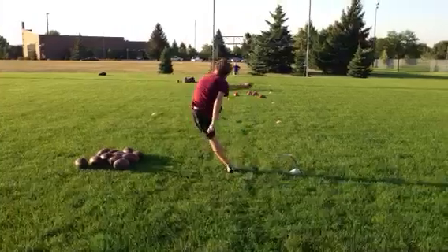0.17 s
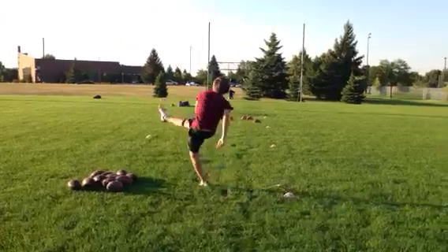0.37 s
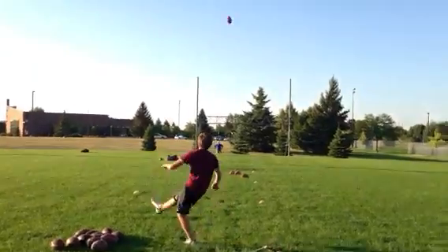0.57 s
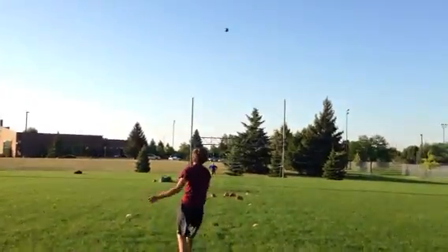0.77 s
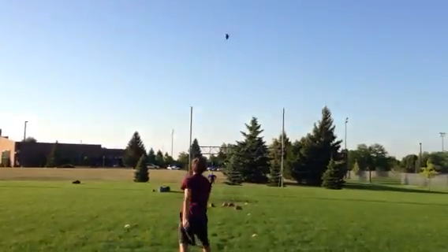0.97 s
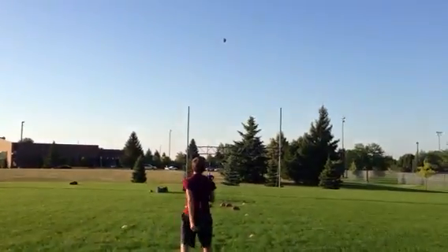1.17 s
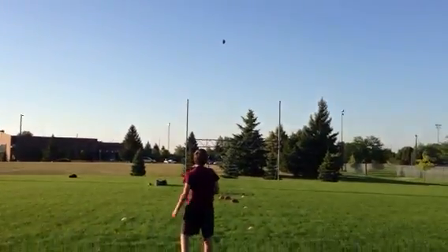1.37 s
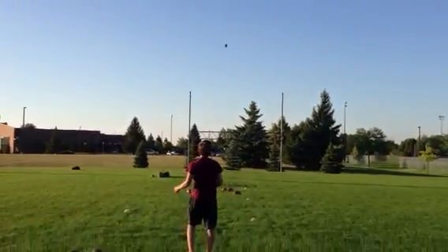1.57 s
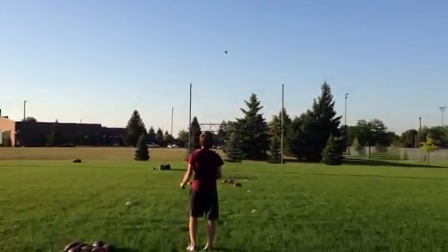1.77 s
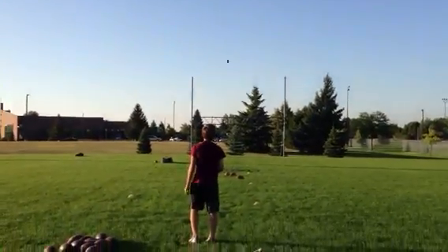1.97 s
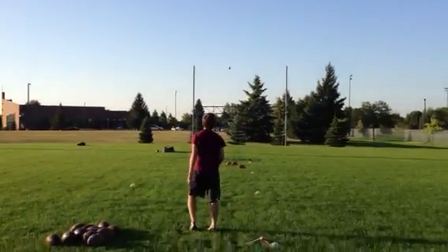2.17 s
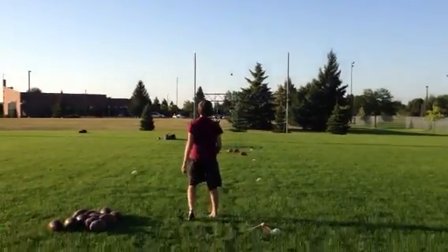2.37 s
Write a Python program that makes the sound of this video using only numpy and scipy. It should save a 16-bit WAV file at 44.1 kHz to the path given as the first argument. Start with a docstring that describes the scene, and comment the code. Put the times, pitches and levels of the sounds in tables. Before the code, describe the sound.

A football kick dominates: low foot thumps at the start, a brief grass swish near 0.1 seconds, then a sharp leathery slap with a short hollow boom at 0.13. Dense dull thumps follow until about 0.7, with a faint holder clink at 0.5. Sparse soft footfalls come near 1.2, 1.7 and 2.1, with tiny dry ticks, over faint distant traffic on an open field.

```python
"""Far traffic hum and clusters of dull low thumps, feet and turf on a grass field, run throughout.
A boot swishes through the grass and slaps a football off its holder; the ball booms briefly.
Faint clinks of the tipping holder and dry ticks are scattered after the kick, with fainter swishes.
Thumps are swelling and dying sines; ball and holder are damped modes; the rest is shaped noise.
The phone that hears it all passes neither deep bass nor the extreme treble."""
import sys
import numpy as np
from scipy import signal
from scipy.fft import rfft, irfft, next_fast_len
from scipy.io import wavfile
from scipy.ndimage import uniform_filter1d, map_coordinates

SR = 44100
rng = np.random.default_rng(int(sys.argv[2]) if len(sys.argv) > 2 else 0)


def bounce(signal):
    """Save signal as a 16-bit WAV file at the path given by the first command-line argument."""
    frames = np.transpose(np.atleast_2d(signal))
    limited = np.clip(frames, -1, 1)
    pcm = np.round(limited * 32767).astype(np.int16)
    wavfile.write(sys.argv[1], SR, pcm)


N = 105928  # length in samples


def amp(db):
    """dB to gain."""
    return 10 ** (np.asarray(db) / 20)


def decay(t, t60):
    """Gain that falls 60 dB in t60 seconds."""
    return amp(-60 * t / t60)


def unit(x):
    """Scale to rms 1."""
    return x / np.sqrt(np.mean(x ** 2) + 1e-20)


def filtered(x, response):
    """x times a complex response of frequency."""
    m = next_fast_len(N + SR // 2)
    spectrum = rfft(x, m) * response(np.fft.rfftfreq(m, 1 / SR))
    return irfft(spectrum, m)[..., :N]


def coloured(x, points):
    """x shaped by (Hz, dB) points on a log frequency axis, rms 1."""
    f, db = np.transpose(points)
    return unit(filtered(x, lambda hz: amp(np.interp(np.log(hz + 1), np.log(f + 1), db))))


def add(out, s, sound):
    """Mix a sound in from time s, trimmed to fit."""
    i = int(round(s * SR))
    sound = sound[max(-i, 0):]
    part = out[max(i, 0):][:len(sound)]
    part += sound[:len(part)]


def ring(modes, t):
    """Damped modes struck at once."""
    return sum(amp(db) * decay(t, t60) * np.sin(2 * np.pi * hz * t) for hz, db, t60 in modes)


TRAFFIC_DB, TRAFFIC_WOBBLE_DB = -58.5, 0.14  # rms level, drift
# Far traffic, spectrum of the noise: f/Hz, relative level/dB (per Hz)
TRAFFIC_SPECTRUM = [(25, -52), (60, -17), (120, -1), (200, -2.5), (300, -12.5), (450, -10.5), (600, -5),
                    (740, -0.5), (1170, -1), (1500, -4.5), (2070, -15), (2700, -13), (3500, -17),
                    (5000, -22), (7500, -24), (13600, -24), (15200, -24.5), (15600, -29)]


def traffic():
    """Far road hum and air hiss: coloured noise whose level drifts a little."""
    drift = map_coordinates(rng.standard_normal(20), [np.arange(N) * 5 / SR])  # 5 points a second
    return amp(TRAFFIC_DB + TRAFFIC_WOBBLE_DB * drift) * coloured(rng.standard_normal(N), TRAFFIC_SPECTRUM)


ROUND_CYCLES = 0.047  # rounding of the crest
SAG, LEAD_SAG, SAG_S = 0.31, 0.33, 0.0059  # share of pitch lost after and before the crest, time constant


def thump(s, db, hz, t60, rise, knock_db):
    """A soft push: swells for some cycles, crests at its highest pitch, then dies; the knock is its octave."""
    t = np.arange(-SR // 40, SR // 8) / SR  # 0 at the crest
    before, after = np.maximum(-t, 0), np.maximum(t, 0)

    def lag(u):
        return u - SAG_S * (1 - np.exp(-u / SAG_S))

    turns = hz * (t - SAG * lag(after) + LEAD_SAG * lag(before))
    rounded = np.hypot(after, ROUND_CYCLES / hz) - ROUND_CYCLES / hz
    swell = np.exp(-(before * hz / rise) ** 2)
    shape = swell * decay(rounded, t60)
    knock = amp(knock_db) * shape * np.sin(4 * np.pi * turns)  # shaped twice, so it dies sooner
    return s + t[0], amp(db) * shape * (np.cos(2 * np.pi * turns) + knock)


PATTER_RATE, PATTER_COUNT = 110, 264  # thumps a second, thumps in all
PATTER_HZ, PATTER_SPREAD = 185.7, 0.36  # middle pitch, spread either way in natural-log units
PATTER_SCATTER_DB, PATTER_KNOCK_DB = 1.5, -7.5
PATTER_T60, PATTER_SWELL = 0.066, 1.02  # s, cycles
# Small thumps between the clear ones: t/s, rms level/dB
PATTER_LEVEL = [(0, -39.5), (0.029, -40), (.045, -52.5), (.095, -47.5), (.15, -34), (.225, -40.5),
                (.27, -48), (.33, -38), (.42, -49), (.5, -45), (.545, -51), (.6, -50.5), (.625, -49.5),
                (.69, -54.5), (.8, -57.5), (1.2, -54), (1.35, -59), (1.76, -56.5), (2.05, -61.5),
                (2.4, -54.5)]


def patter():
    """A random patter of small thumps, one at a random moment of each equal time slot."""
    small = np.zeros(N)
    for k, (u, size, pitch, sign) in enumerate(rng.random((PATTER_COUNT, 4))):
        db = -PATTER_SCATTER_DB * np.log(size + 0.0015)
        hz = PATTER_HZ * np.exp(2 * PATTER_SPREAD * (pitch - .5))
        s, sound = thump((k + u) / PATTER_RATE, db, hz, PATTER_T60, PATTER_SWELL, PATTER_KNOCK_DB)
        add(small, s, sound * np.sign(sign - .5))
    s, db = np.transpose(PATTER_LEVEL)
    return unit(small) * amp(np.interp(np.arange(N) / SR, s, db))


# Feet and turf: crest t/s, level/dB, crest f/Hz, t60/s, swell/cycles, knock level/dB (re the thump)
THUMP_EVENTS = [(0.0058, -23, 213, 0.04, 0.88, -0.5), (0.011, -17.5, 286, 0.036, 0.87, -11),
                (0.018, -23.5, 226, 0.03, .6, -8), (0.023, -24.5, 333.6, 0.037, 0.46, -11.5),
                (.031, -30, 190, .025, 0.72, -11), (0.048, -39, 256, 0.02, 0.76, -7),
                (0.106, -21, 220, 0.041, 0.39, -11), (.1098, -15.5, 420, 0.014, .5, -9),
                (0.1121, -10.5, 242, 0.037, 0.33, -8), (.149, -19.5, 300, 0.01, 0.68, -7.5),
                (.154, -16, 262, 0.012, 0.47, -16), (0.1576, -14, 347, 0.033, 0.89, -18),
                (0.1719, -27, 252, 0.026, 1.1, -2.5), (.1843, -24.5, 230, 0.012, 0.69, -10),
                (0.1893, -11.5, 309, 0.032, 0.48, -5.5), (0.197, -19.5, 250, 0.025, 0.62, -12),
                (0.2024, -17.5, 245, 0.034, 0.52, -4.5), (0.2138, -27.0, 189, 0.082, 3.6, -13),
                (0.2305, -33, 170, 0.052, 1.2, -21), (0.2545, -29.5, 346, 0.02, 1.4, -30),
                (0.2832, -31.5, 210, 0.085, 1.35, -21), (0.291, -32, 408, 0.011, 0.83, -29),
                (0.297, -24.5, 268, 0.056, 0.85, -7.5), (0.312, -23, 303, 0.013, 0.6, -15),
                (0.321, -32.0, 230.0, 0.038, 1.1, -9), (0.337, -24, 468, 0.021, 1.5, -25),
                (0.3496, -33, 218, 0.067, 1.7, -2.5), (0.377, -31, 177, 0.095, 0.9, -11),
                (0.4107, -30, 285, 0.012, 0.5, -20), (0.449, -30.0, 230, 0.03, 0.74, -10.5),
                (.5, -33, 220, 0.022, .6, -14), (0.5076, -21.5, 244, 0.02, 0.69, -15),
                (0.5136, -31, 232, .015, 0.51, -19), (0.5181, -26.5, 240, 0.024, 0.43, -14),
                (0.525, -30.5, 171, 0.017, 0.99, -8), (0.5663, -39.5, 234, 0.034, 0.8, -21),
                (0.5797, -34.5, 227, 0.025, 1, -12), (.5946, -38.5, 474, .01, 0.67, -20),
                (0.5972, -23.5, 226, 0.037, 0.45, -17), (0.6481, -39, 165, 0.018, 1.2, -6.5),
                (0.6572, -30, 172, 0.043, 0.44, -13), (0.7365, -36.5, 177, 0.026, 0.65, -19),
                (0.859, -46, 160.0, 0.096, 1.1, -12), (1.14, -37.5, 243, 0.028, 0.95, -19),
                (1.1604, -38, 210, 0.02, 0.57, -17), (1.1652, -38.5, 270, .015, 0.55, -19),
                (1.169, -32, 213, 0.06, .45, -16), (1.226, -45, 232, 0.065, 1.5, -16),
                (1.2363, -43, 232, .03, 0.52, -14), (1.2486, -39.5, 187, 0.1, 0.5, -21),
                (1.282, -43, 208, 0.036, 0.66, -12), (1.6848, -38, 497, 0.018, .8, -20),
                (1.689, -20.5, 223.5, 0.053, 0.95, -26), (1.7618, -37.0, 294, 0.034, 1.3, -19),
                (1.829, -51, 182, 0.03, 1.2, -18), (1.9013, -41, 226, 0.024, 0.46, -21),
                (2.1093, -26, 223.6, 0.045, 1.43, -11.5), (2.121, -29.5, 203, 0.056, 0.5, -10.5),
                (2.197, -40, 203, 0.095, 0.75, -14), (2.2344, -34, 227, 0.02, 1.5, -32)]


def thumps():
    """The clear dull thumps of feet and turf, each a swelling and dying sine."""
    out = np.zeros(N)
    for row in THUMP_EVENTS:
        add(out, *thump(*row))
    return out


BLADES, BLADE_DB, PATCHY_DB = 4000, 2.5, 3.5  # crackles a second, size scatter, uneven patches
TREBLE_HZ, BODY_SPEED, TREBLE_SPEED = 6760, 0.73, 1.5  # split; decay speeds, the treble dies sooner
# Grass noise spectrum: f/Hz, relative level/dB (per Hz)
GRASS_SPECTRUM = [(400, -20), (700, 2.5), (1200, -8), (2000, -4.5), (3100, -17), (4400, -13), (6000, -9),
                  (7800, -18), (10000, -16.5), (12300, -24), (14000, -16), (15500, -19.5)]
# Boot brushing grass: start t/s, rise/s, hold/s, t60/s (at decay speed 1), level/dB, extra treble level/dB
GRASS_SWISHES = [(0.094, 0.02, 0.021, 0.054, -34.5, -0.5), (0.1063, 0.0023, 0.0025, .03, -39, -11),
                 (0.318, 0.0098, 0.1, 0.41, -66, 4), (.412, 0.0097, 0.053, 0.14, -61, -3),
                 (.436, 0.012, .004, 0.075, -54, -6), (0.921, 0.025, 0.029, 0.22, -69.5, 5.5),
                 (1.28, 0.009, 0.0087, 0.045, -64, -10), (1.63, 0.014, 0.0098, .06, -61, -20)]


def grass():
    """Dense, patchy crackles of blades under each brush of the boot."""
    t = np.arange(N) / SR
    hit = rng.random(N) < BLADES / SR
    crackle = rng.standard_normal(N) * (1 + hit * amp(BLADE_DB * 2 * rng.random(N)))
    z = signal.stft(crackle, nperseg=128)[2]
    patches = uniform_filter1d(rng.standard_normal(z.shape), size=4, axis=0)
    patches = unit(uniform_filter1d(patches, size=4, axis=1))
    patchy = signal.istft(z * amp(PATCHY_DB * patches), nperseg=128)[1][:N]
    grains = coloured(patchy, GRASS_SPECTRUM)
    body = filtered(grains, lambda hz: 1 / (1 + (hz / TREBLE_HZ) ** 4))
    treble = grains - body

    def level(speed, bright):
        total = np.zeros(N)
        for s, rise, hold, t60, db, treble_db in GRASS_SWISHES:
            dying = decay(speed * np.maximum(t - s - rise - hold, 0), t60)
            total += amp(db + bright * treble_db) * dying * np.clip((t - s) / rise, 0, 1) ** 2
        return total

    return level(BODY_SPEED, False) * body + level(TREBLE_SPEED, True) * treble


KICK_S, KICK_DB = .1315, -11.5  # start, level of the whole kick; the dB below are relative to it
CONTACT_S, DENT_S = 0.00013, .0007  # time constant of the boot's contact, length of the dent
SLAP_DB, SLAP_T60, SLAP_HZ = -6.5, 0.0047, 7960  # the last is the low-pass corner
BOOM_HZ, BOOM_START_HZ, BOOM_FALL_S, BOOM_T60 = 149, 614, 0.00083, 0.0915  # pitch falls to BOOM_HZ
SCATTER_DB, SCATTER_T60, SCATTER_HZ = -22, 0.17, 2500  # dull afterscatter, with its low-pass corner
# Modes of the ball's shell: f/Hz, level/dB (re the kick), t60/s
BALL_MODES = [(640, -26, 0.041), (926, -24.5, 0.1), (1545, -10.5, 0.017), (2560, -5.5, 0.0083),
              (3525, -3, 0.0054), (4400, -16, .008), (5370, -5.5, 0.0077), (6150, -2, 0.007),
              (10200, -5.5, .004)]


def kick():
    """The boot slaps and dents the leather; the ball's air booms, its shell rings, the ground scatters the slap."""
    out, scatter, t = np.zeros(N), np.zeros(N), np.arange(SR // 4) / SR
    slap = amp(SLAP_DB) * decay(t, SLAP_T60) * rng.standard_normal(len(t))
    contact = 1 - np.exp(-t / CONTACT_S)
    dent = (t < DENT_S) * np.sin(np.pi * t / DENT_S)
    add(out, KICK_S, amp(KICK_DB) * ((slap - ring(BALL_MODES, t)) * contact - dent))

    extra_turns = (BOOM_START_HZ - BOOM_HZ) * BOOM_FALL_S * (1 - np.exp(-t / BOOM_FALL_S))
    boom = decay(t, BOOM_T60) * np.sin(2 * np.pi * (BOOM_HZ * t + extra_turns))
    add(out, KICK_S + DENT_S, amp(KICK_DB) * boom)

    tail = decay(t, SCATTER_T60) * rng.standard_normal(len(t))
    add(scatter, KICK_S, amp(KICK_DB + SCATTER_DB) * tail)

    def dull(top_hz):
        return lambda hz: (top_hz / (top_hz + 1j * hz)) ** 2

    return filtered(out, dull(SLAP_HZ)) + filtered(scatter, dull(SCATTER_HZ))


CLINK_RISE_S, CLINK_RATTLE, RATTLE_S = 0.0025, .6, 0.0006  # rise time constant; rattle depth and grain
# Modes of the holder: f/Hz, relative level/dB, t60/s
HOLDER_MODES = [(4760, -14, .025), (5640, 5, 0.037), (6300, -5, .02), (6950, 6.5, 0.035), (7600, -6, .018)]
# Clinks of the holder: t/s, nominal peak level/dB
HOLDER_CLINKS = [(0.173, -50), (0.5007, -45.5)]


def clinks():
    """The tipping holder rings in damped modes, roughened by a random rattle."""
    out, t = np.zeros(N), np.arange(SR // 10) / SR
    for s, db in HOLDER_CLINKS:
        rattle = 1 + CLINK_RATTLE * map_coordinates(rng.standard_normal(200), [t / RATTLE_S])
        rise = 1 - np.exp(-t / CLINK_RISE_S)
        add(out, s, amp(db - 10.0) * rattle * rise * ring(HOLDER_MODES, t))  # 10 dB for the modes' sum
    return out


TICK_HZ, TICK_TOP_HZ, TICK_T60 = 6000, 12000, 0.0071  # band corners, decay in s
# Faint dry ticks: t/s, level/dB (before the band filter)
TICK_EVENTS = [(.337, -49), (1.057, -46.5), (1.061, -50), (1.293, -60), (1.418, -49), (1.642, -66)]


def ticks():
    """Very short bursts of noise, kept to a high band."""
    out, t = np.zeros(N), np.arange(SR // 10) / SR
    for s, db in TICK_EVENTS:
        add(out, s, amp(db) * decay(t, TICK_T60) * rng.standard_normal(len(t)))
    return filtered(out, lambda hz: (1j * hz / (TICK_HZ + 1j * hz)) ** 2 / (1 + (hz / TICK_TOP_HZ) ** 6))


def scene():
    """All sources, one channel."""
    return (traffic() + patter() + thumps() + grass() + kick() + clinks() + ticks())[None]


LOW_CUT_HZ, TOP_HZ = 80.4, 15340


def record(dry):
    """The phone cuts the deep bass and all above its band limit."""
    return filtered(dry, lambda hz: (hz < TOP_HZ) / np.sqrt(1 + (LOW_CUT_HZ / (hz + 1)) ** 6))


dry = scene()
out = record(dry)
bounce(out)
```